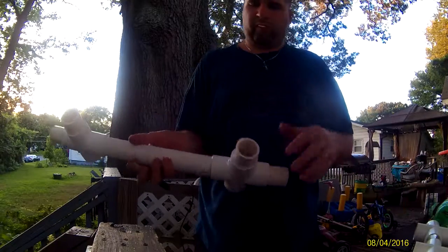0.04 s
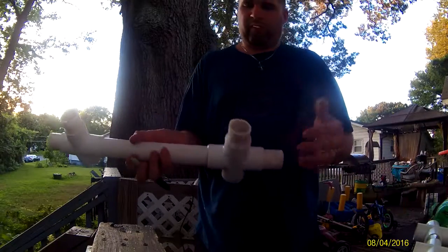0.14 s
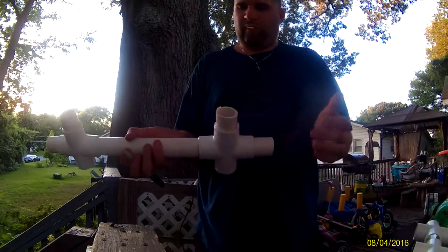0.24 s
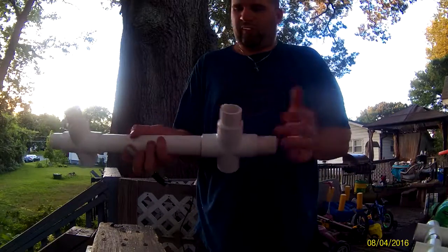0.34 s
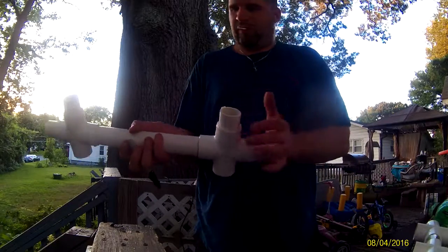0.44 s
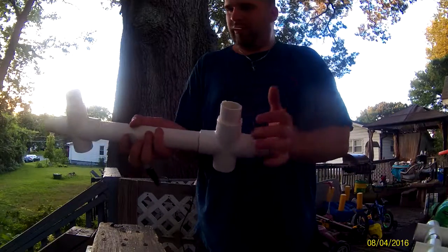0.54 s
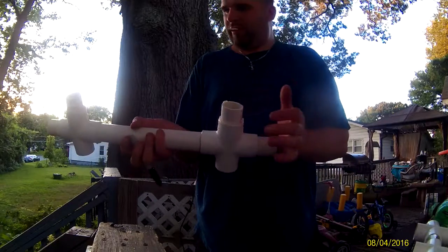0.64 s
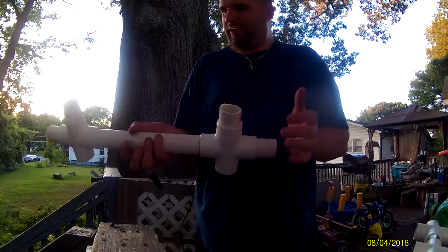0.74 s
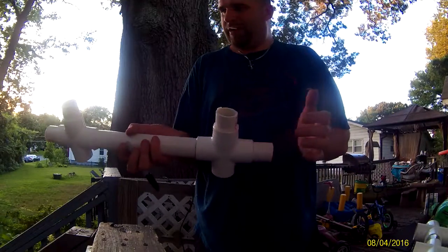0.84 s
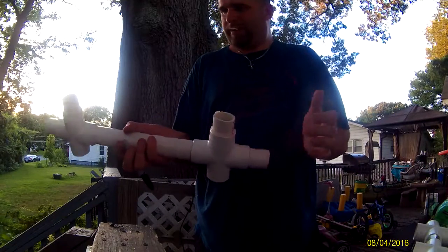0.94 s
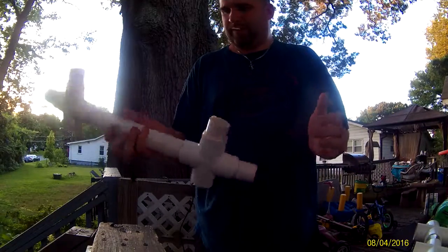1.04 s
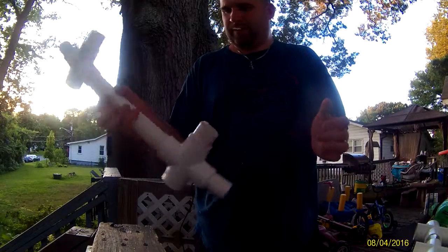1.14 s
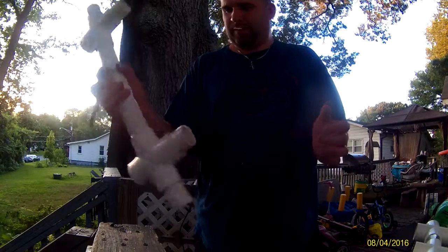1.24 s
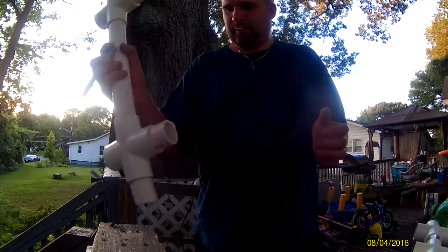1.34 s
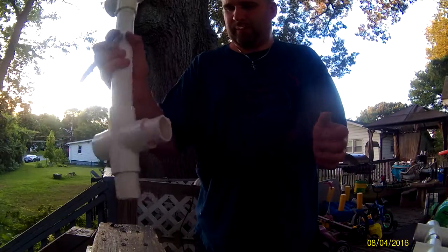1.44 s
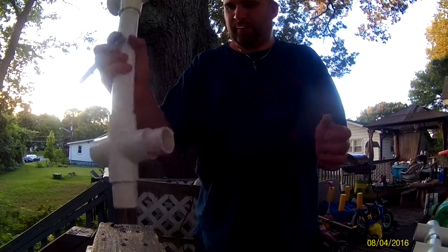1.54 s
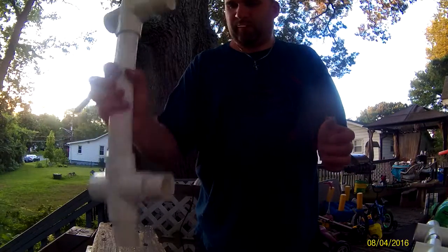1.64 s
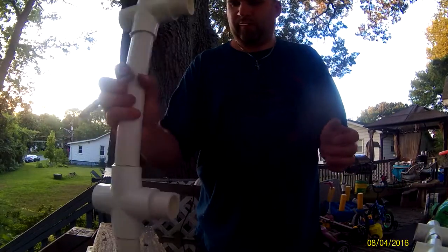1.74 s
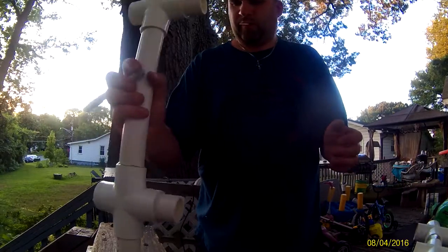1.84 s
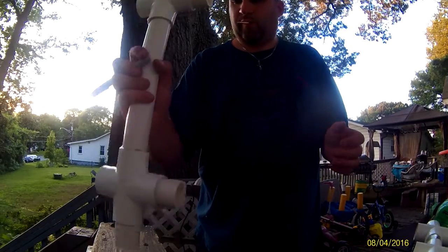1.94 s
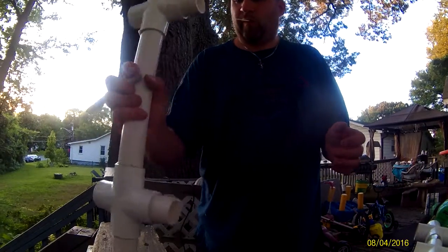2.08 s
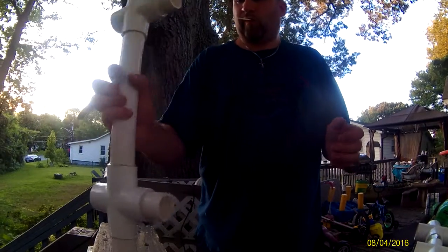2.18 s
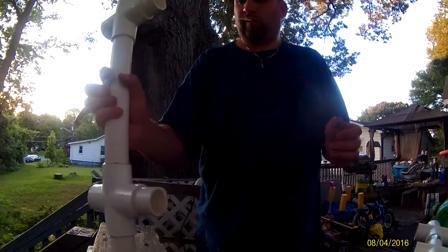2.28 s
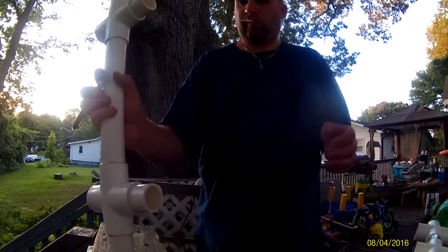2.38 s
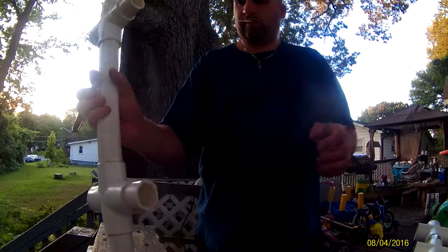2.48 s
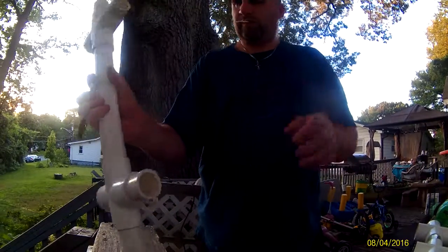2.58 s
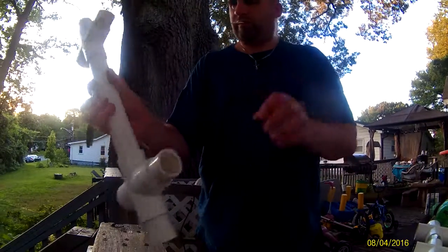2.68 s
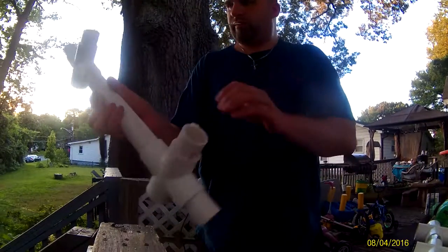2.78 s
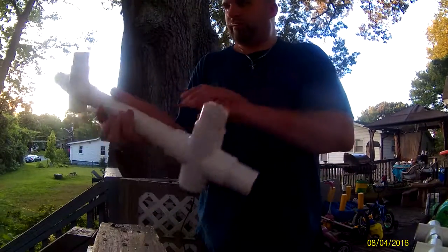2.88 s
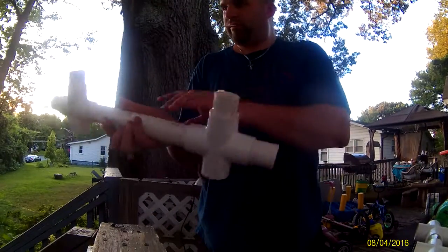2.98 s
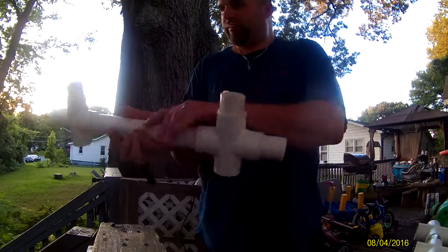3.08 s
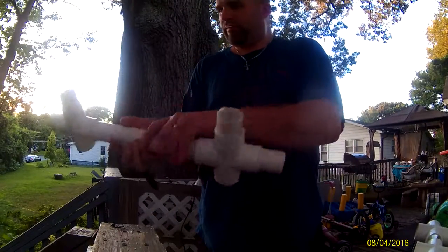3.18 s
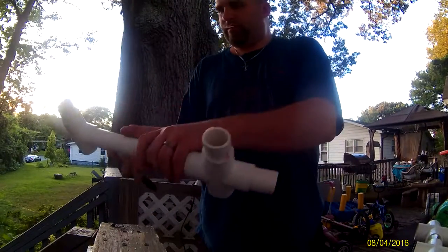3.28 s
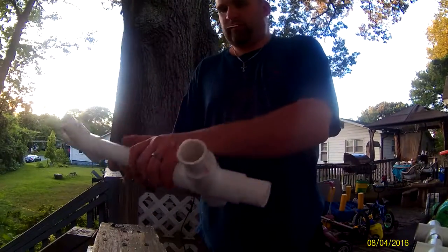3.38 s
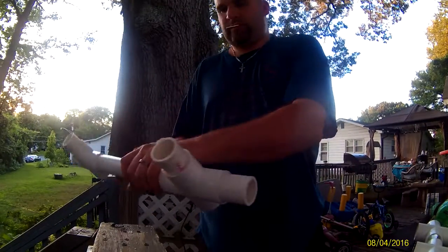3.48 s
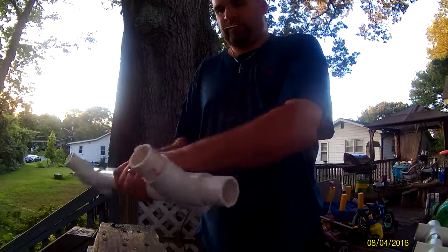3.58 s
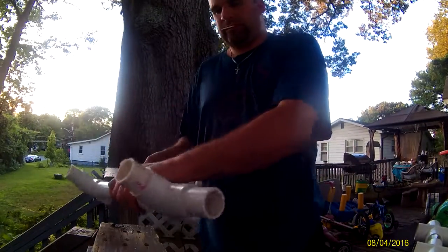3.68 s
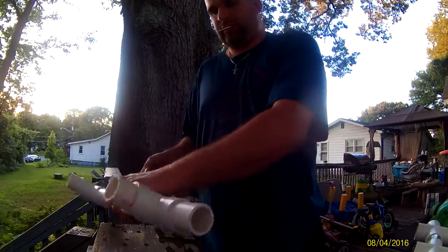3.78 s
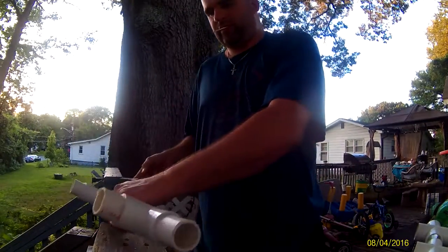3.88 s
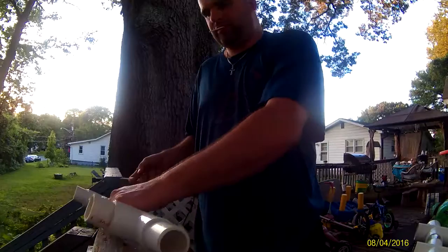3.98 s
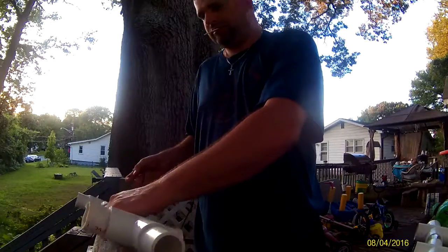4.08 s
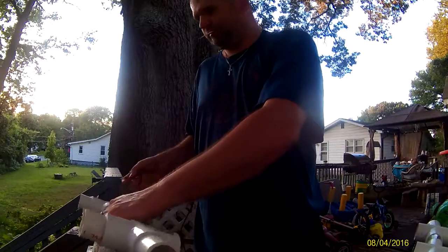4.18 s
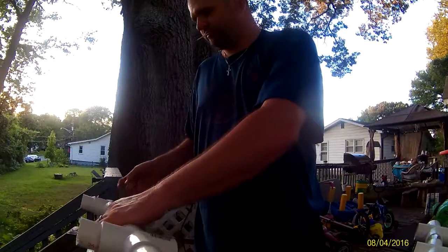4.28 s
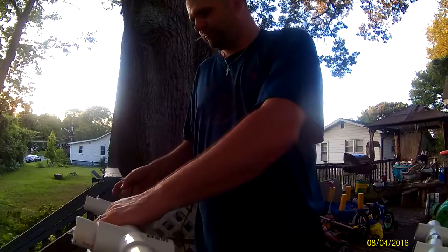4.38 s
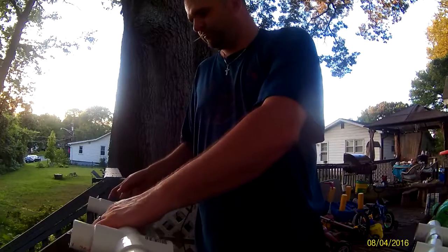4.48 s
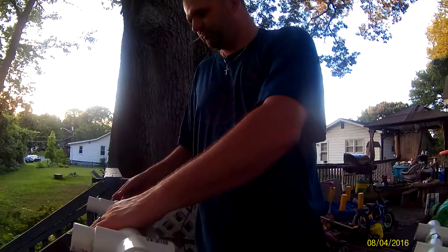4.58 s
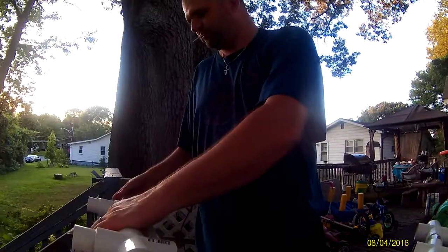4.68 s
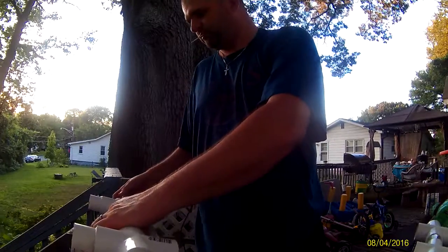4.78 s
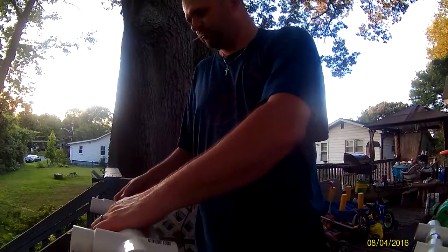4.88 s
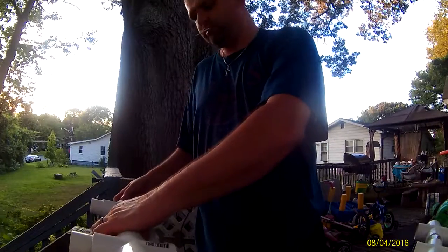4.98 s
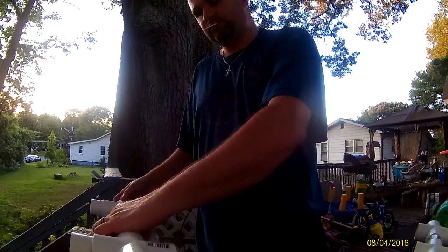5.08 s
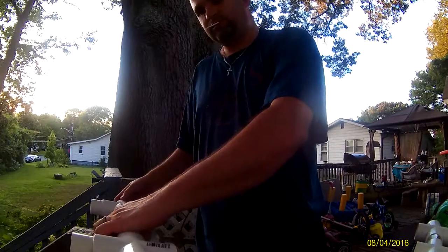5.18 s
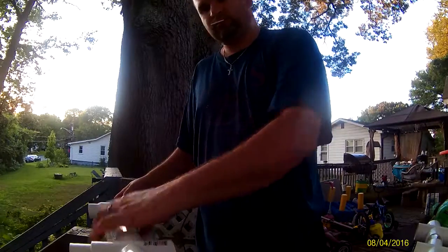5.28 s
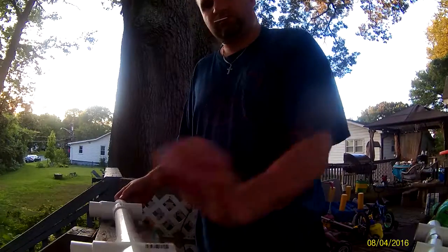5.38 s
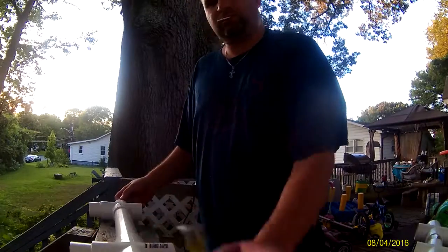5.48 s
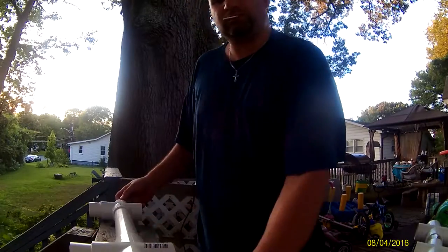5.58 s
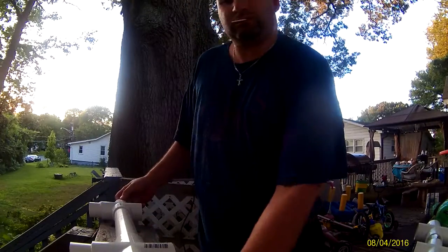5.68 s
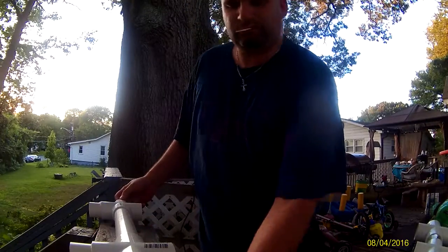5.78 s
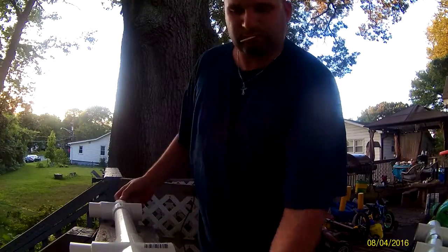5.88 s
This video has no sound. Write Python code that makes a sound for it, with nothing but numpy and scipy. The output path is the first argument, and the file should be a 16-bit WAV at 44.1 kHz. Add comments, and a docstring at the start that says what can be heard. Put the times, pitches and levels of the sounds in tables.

```python
"""Plastic pipes knocked on a wooden bench

A frame of plastic pipes is patted by hand, stood twice on a bench, then laid down and shifted about.
Pats and knocks are dying sines, the knocks with bursts of noise; rubs, scuffs and rattles are shaped noise.
The two hard knocks overload the input, set the air in the pipes ringing and make a loose part chatter.
A hand scuffs over the bench at the end. Outdoors: quiet air, insects and a thin electronic whine."""
import sys
import numpy as np
from scipy import signal
from scipy.fft import rfft, irfft
from scipy.io import wavfile

SR = 44100
rng = np.random.default_rng(int(sys.argv[2]) if len(sys.argv) > 2 else 0)


def to_wav(s):
    """Save 16-bit WAV."""
    ch = np.atleast_2d(s).T  # columns
    pcm = np.round(np.clip(ch, -1, 1) * 32767)  # PCM
    wavfile.write(sys.argv[1], SR, pcm.astype(np.int16))


N = 261557  # length of the scene in samples
RING_T = np.arange(SR) / SR  # one second of time steps

# Columns called relative_db give balance only: the sound is scaled again later.
# Colour of the outdoor air: pitch_hz, relative_db (per Hz)
AIR_COLOUR = [(20, -3), (107, -2), (240, -7.5), (320, -11), (620, -14.5), (1000, -18.5), (2000, -25),
              (3500, -30), (5000, -31.5), (9000, -34.5), (16000, -36.5)]
# How long the echo of the yard lasts: pitch_hz, fade_60db_s
YARD_FADE = [(100, 0.94), (400, 0.38), (1400, 0.41), (3000, 0.11), (10000, .1)]
# Rasps of a single insect: middle_s, level_db, length_s
INSECT_RASPS = [(1.072, -71.5, .2), (1.352, -83, 0.094), (3.955, -76, 0.2)]
# Colour of the far chorus: pitch_hz, relative_db (per Hz)
CHORUS_COLOUR = [(6000, -41.5), (6350, -9), (6550, -2), (6800, 1.5), (7000, -7.5), (7400, -33), (8000, -54.0)]
# Colour of the rasping insect and of a steady faint hiss: pitch_hz, relative_db (per Hz)
RASP_COLOUR = [(4600, -46), (5500, -1.5), (5900, 4), (7300, -1), (8200, -12.0), (9500, -44.0)]

# Pushes along the bench: middle_s, half_length_s, board_rumble_db, wall_hiss_db, skin_hiss_db
# (before the flicker of the grain)
PUSHES = [(4.223, 0.1, -61, -81, -92), (4.486, 0.021, -53, -71, -88), (4.848, 0.036, -53, -67, -73),
          (5.155, 0.062, -51.5, -55.5, -62), (5.332, 0.12, -51, -72, -93), (5.587, 0.061, -53, -70, -52.5),
          (5.733, 0.15, -61, -57, -71), (5.87, 0.035, -43, -47, -61.5)]
# Colour of the rubbed boards: pitch_hz, relative_db (per Hz)
BOARD_COLOUR = [(80, -18), (160, 3), (230, -1), (300, 0), (460, -1.5), (750, -8), (1200, -34), (3000, -45)]
# Colour of the rubbed pipe wall: pitch_hz, relative_db (per Hz)
WALL_COLOUR = [(600, -20), (1000, -14), (1230, 4.5), (1400, 1), (1620, 6.5), (1900, -27), (2400, -19),
               (6000, -44)]
# Sharp slips of skin and plastic on wood: start_s, level_db (before rise, fade and grain),
# fade_s (to about a third), tilt_db_per_octave
SLIPS = [(4.785, -41, 0.0072, 3.5), (5.127, -24, 0.01, -6), (5.505, -38, 0.0054, 7.5),
         (5.527, -49, 0.0066, 0), (5.539, -42, 0.0073, 2), (5.548, -36.5, 0.0062, 4),
         (5.569, -33.5, 0.0041, 2.5), (5.584, -34, 0.0049, 3.5), (5.596, -31, 0.0062, 1),
         (5.644, -45, 0.026, 0), (5.707, -47.5, .011, 3), (5.812, -33, 0.013, -1),
         (5.862, -42, 0.035, -0.5)]
# Colour of skin and plastic on wood: pitch_hz, relative_db (per Hz)
SLIP_COLOUR = [(530, -60), (900, -12), (1230, 0.5), (2960, -7), (3190, -9), (4050, -5.5), (5040, -10),
               (6480, -7), (8760, -14), (15200, -12), (16000, -48)]
# Runs of ticks from a loose plastic part: start_s, first_tick_db (before rise and fade)
TICK_RUNS = [(1.7368, -17.5), (1.749, -26.5), (1.7612, -20.5), (2.0876, -12.5), (2.095, -10), (2.1084, -23),
             (2.126, -29.5), (2.1484, -37)]
# Ring of the loose part: pitch_hz, relative_db (per Hz)
LOOSE_PART_COLOUR = [(1500, -27), (3700, -6.5), (5100, 2.5), (6800, -10), (8200, -4.5), (9400, -15),
                     (11000, -10), (13000, -28), (16000, -35.5)]

# Palm pats: start_s, note_db (added to the modes), skin_db (before the slap setting)
PALM_PATS = [(0.4662, -36, -27), (0.473, -64, -27)]
# Notes of the held pipe under a palm: pitch_hz, level_db (before the pat's level), fade_60db_s
HELD_PIPE = [(444, 1.5, 0.24), (698, -1, 0.11), (1180, -14, 0.14), (1700, -18, 0.058)]
# Colour of the skin slap: pitch_hz, relative_db (per Hz)
SKIN_COLOUR = [(200, -18), (500, 13.5), (1200, -7.5), (2000, -12), (3100, -8.5), (3700, -25), (12000, -31)]

# Knocks and rebounds of the frame lying down: start_s, strength_db (before the body boost),
# hardness_hz (upper corner), most_excited_hz, rebound_delay_s, rebound_db (against the first knock)
LYING_KNOCKS = [(4.197, -28.5, 1450, 880, .007, -5.5), (4.502, -30.5, 1100, 459, 0.033, -16.5),
                (4.651, -40.5, 640, 427, 0.0091, -16), (4.862, -35, 400, 373, .02, -18),
                (4.9516, -22.5, 1830, 910, 0.008388, -11.5), (4.984, -23.5, 1350, 424.9, .024, -2),
                (5.125, -12, 1200, 285, .014, -2), (5.1305, -7.5, 2585, 326, 0.0297, -25),
                (5.178, -23.5, 1400, 342, 0.012, -14), (5.271, -7.5, 1980, 520, 0.014, -3),
                (5.3604, -14, 820, 457, .025, -7), (5.435, -16, 720, 520, 0.029, -16),
                (5.455, -31, 2400, 1570, .006, -11), (5.827, -26, 1975, 424.4, 0.017, -7),
                (5.851, -23, 1400, 450, 0.012, -3.5), (5.913, -35, 880, 412, 0.011, 3)]
# Pipe and bench when the pipe lies under the hands: pitch_hz (before a small detune), relative_db, fade_60db_s
LYING_MODES = [(166.2, -10, 0.18), (235, -3, 0.11), (302.7, 4.5, 0.072), (394, -13, 0.11),
               (416, -11, 0.064), (487, 0, 0.09), (565, -1.5, 0.051), (640, -7.5, 0.063), (711, 6, 0.03),
               (838, -3, 0.032), (920, -8, 0.057), (1030, -5.5, 0.013), (1224, -1.5, 0.049),
               (1520, -5.5, 0.035), (1583.4, -6, 0.036), (1656, -6, 0.023), (1970, 10, 0.005),
               (2545, -4.5, 0.03)]
# Pipe and bench when the pipe stands upright: pitch_hz (before a small detune), relative_db, fade_60db_s
UPRIGHT_MODES = [(143, -21.5, 0.22), (286, -2, 0.066), (329.4, -7.5, 0.098), (412.8, -0.5, 0.036),
                 (521.3, 2.5, 0.044), (578.5, 0.5, 0.045), (750, -2.5, 0.07), (901, -9.5, 0.056),
                 (1089, -2.5, 0.013), (1240, -3.5, 0.044), (1419.3, -6, 0.04), (1524, -3.5, 0.037),
                 (1754, -8, 0.016), (1934, -11.5, 0.037), (2230, -7, 0.022), (2760, -0.5, 0.025)]
# Crowded small modes of wall and board: pitch_hz, relative_db (per Hz)
CRACK_COLOUR = [(100, -14), (300, 0), (1600, 2), (2700, -6), (3500, -12.5), (5000, -6.5), (9000, -12),
                (16000, -17)]

# Frame stood on its end: start_s, strength_db (body boost comes on top for the blows),
# lightness_hz (lower corner), seating_most_excited_hz, air_ring_db (added to the air modes),
# air_tilt_db_per_octave, first_flight_s, first_bounce_db (before edge and body levels)
FRAME_STANDS = [(1.7265, 1, 199.4, 1420, -26.5, -1.5, .0313, -14),
                (2.0775, 8, 174.4, 511.3, -28.5, 4, .0574, -8)]
# Each landing touches with the rim, seats flat, then settles:
# delay_s, level_db (against the strength), hardness_hz (upper corner)
LANDING_STEPS = [(0, 1.5, 1099), (.0029, 5.5, 2996), (0.011, -12.5, 2110)]
# The two edges of the rim: delay_share (of the first flight), level_db (against the bounce),
# change_per_bounce_db, most_excited_hz
RIM_EDGES = [(0, -1.5, -23.5, 857), (0.221, -3, -12.5, 1400)]
# Air columns inside the open pipes: pitch_hz, level_db (before the ring's level and tilt), fade_60db_s
PIPE_AIR = [(454, -5, 0.44), (641, -1.5, 0.57), (1334, -9.5, 0.44), (1690, -19.5, .2)]
# The deck under a landing: pitch_hz, level_db (before the landing's strength), fade_60db_s
DECK_MODES = [(35.25, -31, .071), (98, -26, .08)]

AIR_LEVEL_DB = -57
WHINE_HZ, WHINE_BUZZ_HZ = 13364, 41
CHORUS_PER_S, CHORUS_CREST_S = 3.35, .268
CHORUS_DB, CHORUS_SWING_DB, CHORUS_DRIFT_DB = -70.5, 2.5, -1.4
TICK_GAP_S, TICK_JITTER, TICK_LOSS_DB = .0035, 0.24, -9
REBOUND_LIFT, REBOUND_HARDNESS = 1.22, 0.58  # a rebound favours higher modes and is a little softer
LIGHT_HZ, LIGHT_AT_HZ, LIGHT_POWER = 236, 450, 0.49  # the higher a knock is pitched, the more bass it loses
RIM_HZ, SETTLE_HZ = 500, 1358  # most excited by the first touch and by the settling
BOUNCE_HARD_HZ, BOUNCE_SOFTENING = 1250, 0.65  # upper corner of the first bounce, its factor per bounce
BOUNCE_LIGHT_HZ = 380  # lower corner of every bounce
BOUNCE_KEEP = .635  # each flight lasts this share of the one before
EDGE_HZ = 16200  # upper limit of the sound


def gain_of(db):
    """Turns decibels into amplitude."""
    return 10 ** (np.asarray(db) / 20)


def evened(x):
    """Scales a sound to rms 1."""
    return x / np.sqrt(np.mean(x ** 2) + 1e-20)


def read(points, hz):
    """Reads a table between its points, on a log-frequency axis."""
    f, value = np.transpose(points)
    return np.interp(np.log(hz + 1), np.log(f + 1), value)


def add(mix, s, sound):
    """Mixes a sound in at time s."""
    part = mix[round(s * SR):][:len(sound)]
    part += sound[:len(part)]


def noise(colour, size, tilt_db=0):
    """Noise of rms 1 with a given colour, tilted in dB per octave."""
    hz = np.fft.rfftfreq(size, 1 / SR)
    shape = gain_of(read(colour, hz) + tilt_db * np.log2(hz + 1))
    return evened(irfft(rfft(rng.standard_normal(size)) * shape, size))


def wander(hz):
    """Smooth random movement of rms 1, with nothing faster than hz."""
    slow = np.fft.rfftfreq(N, 1 / SR) < hz
    return evened(irfft(rfft(rng.standard_normal(N)) * slow, N))


def filtered(x, hz, kind, order=2):
    """Low-pass or high-pass filter that only looks back in time."""
    return signal.sosfilt(signal.butter(order, min(hz, .45 * SR), kind, fs=SR, output="sos"), x)


def ring(modes, spread_db=0):
    """Dying sines, the weight of each shifted by chance if a spread is given."""
    hz, db, t60 = np.transpose(modes)[:, :, None]
    t = RING_T[RING_T < 1.2 * t60.max()]
    sign = (-1) ** (np.arange(len(hz))[:, None] // 2)
    weight = sign * gain_of(db + spread_db * rng.standard_normal(hz.shape))
    fade = gain_of(-60 * t / t60)
    return (weight * fade * np.sin(2 * np.pi * hz * t)).sum(0)


def background(whine_db=-72):
    """Quiet outdoor air as noise, and a high whine that buzzes as its sign flips."""
    t = np.arange(N) / SR
    # odd harmonics add up to a rounded square wave
    flips = sum(np.sin(2 * np.pi * k * WHINE_BUZZ_HZ * t) / k for k in range(1, 12, 2))
    whine = evened(flips * np.sin(2 * np.pi * WHINE_HZ * t + .5 * wander(6)))
    return gain_of(AIR_LEVEL_DB) * noise(AIR_COLOUR, N) + gain_of(whine_db) * whine


def insects(flutter_db=0.82, hiss_db=-76.5):
    """A far chorus swells about three times a second; one insect rasps now and then over a faint hiss."""
    beat = np.cos(2 * np.pi * CHORUS_PER_S * (np.arange(N) / SR - CHORUS_CREST_S))
    swell = gain_of(CHORUS_DB + CHORUS_SWING_DB * beat + CHORUS_DRIFT_DB * wander(2))
    chorus = swell * noise(CHORUS_COLOUR, N) * gain_of(flutter_db * wander(60))
    rasp = np.zeros(N)
    for s, db, length_s in INSECT_RASPS:
        add(rasp, s - length_s / 2, gain_of(db) * signal.windows.tukey(round(length_s * SR), .7))
    return chorus + (rasp + gain_of(hiss_db)) * noise(RASP_COLOUR, N)


def yard(x):
    """Faint scatter from deck, tree and houses: a noise tail whose treble dies first."""
    hz, t, z = signal.stft(rng.standard_normal(SR), SR, nperseg=256)
    fade = gain_of(-60 * t / read(YARD_FADE, hz)[:, None])
    tail = signal.istft(z * fade, SR, nperseg=256)[1]
    tail = filtered(tail[:SR], 1800, "low") * (1 - np.exp(-RING_T / 0.014))
    return signal.fftconvolve(x, tail / np.linalg.norm(tail))[:N]


def slides(grain_db=3.0, catch_db=6.5, catch_hz=90, skin_tilt_db=1.0):
    """Each push rubs the boards and the pipe wall, while the hand catches and slips on the wood."""
    t = np.arange(N) / SR
    boards, wall = noise(BOARD_COLOUR, N), noise(WALL_COLOUR, N)
    skin = noise(SLIP_COLOUR, N, skin_tilt_db) * gain_of(catch_db * wander(catch_hz))
    out = np.zeros(N)
    for s, half_s, board_db, wall_db, skin_db in PUSHES:
        speed = np.exp(-np.minimum(((t - s) / half_s) ** 2, 20))  # swells and fades
        out += speed * (gain_of(board_db) * boards + gain_of(wall_db) * wall + gain_of(skin_db) * skin)
    return out * gain_of(grain_db * wander(440))


def scuffs(rise_s=0.0012, grain_db=2.5):
    """Short slips as bursts of noise, made grainy by a fast flicker of the level."""
    out, t = np.zeros(N), RING_T[:8192]
    for s, db, fade_s, tilt_db in SLIPS:
        shape = (1 - np.exp(-t / rise_s)) * np.exp(-t / fade_s)
        add(out, s, gain_of(db) * noise(SLIP_COLOUR, len(t), tilt_db) * shape)
    return out * gain_of(grain_db * wander(410))


def chatter(rise_s=0.00053, fade_s=0.0012, count=3):
    """A loose part, thrown up by the hard blows, bounces in quick, dying runs of bright ticks."""
    out, t = np.zeros(N), RING_T[:1024]
    shape = (1 - np.exp(-t / rise_s)) * np.exp(-t / fade_s)
    for s, db in TICK_RUNS:
        for k in range(count):
            tick = noise(LOOSE_PART_COLOUR, len(t)) * shape
            add(out, s, gain_of(db + k * TICK_LOSS_DB) * tick)
            s = s + TICK_GAP_S * np.exp(TICK_JITTER * rng.standard_normal())
    return out


def pats(slap_db=-12, slap_t60=0.038):
    """A palm taps the pipe: a small slap of skin (noise) and a soft, hollow note (dying sines)."""
    out, t = np.zeros(N), RING_T[:4096]
    for s, db, skin_db in PALM_PATS:
        add(out, s, gain_of(db) * ring(HELD_PIPE))
        slap = gain_of(skin_db + slap_db - 60 * t / slap_t60) * noise(SKIN_COLOUR, len(t))
        add(out, s, slap)
    return filtered(out, 210, "high")


def contact(modes, hard_hz, light_hz, main_hz, main_db, crack_db, crack_t60, detune, snap_t60):
    """One blow of unit energy: a soft contact loses treble, a light one loses bass."""
    hz, db, t60 = np.transpose(modes)
    db = db + main_db * np.exp(-(np.log2(hz / main_hz) / 0.24) ** 2)  # the struck spot favours some modes
    hz = hz * (1 + detune * rng.standard_normal(len(hz)))  # each blow's modes are detuned a little by chance
    body = ring(np.transpose([hz, db, t60]), spread_db=2.44)
    t = RING_T[:len(body)]
    crack = gain_of(crack_db) * noise(CRACK_COLOUR, len(t))
    # the bright snap has its own, shorter fade than the low crack
    body = body + filtered(crack, 1900, "low", order=6) * gain_of(-60 * t / crack_t60)
    body = body + filtered(crack, 2200, "high", order=6) * gain_of(5 - 60 * t / snap_t60)
    body = filtered(body, hard_hz, "low")
    body = filtered(body, light_hz, "high", order=1)
    body = filtered(body, 47, "high")  # keeps deep bass out of the blow
    return body / np.linalg.norm(body)


def knocks(body_db=17):
    """Damped, hollow knocks of the fittings on the boards, each followed by a softer rebound."""
    out = np.zeros(N)
    for s, db, hard_hz, main_hz, rebound_s, rebound_db in LYING_KNOCKS:
        first = (s, db, hard_hz, main_hz)
        rebound = (s + rebound_s, db + rebound_db, hard_hz * REBOUND_HARDNESS, main_hz * REBOUND_LIFT)
        for at, strength, hard, main in (first, rebound):
            light = LIGHT_HZ * (main / LIGHT_AT_HZ) ** LIGHT_POWER
            blow = contact(LYING_MODES, hard, light, main, main_db=9.0, crack_db=1.5,
                           crack_t60=0.055, detune=0.021, snap_t60=0.031)
            add(out, at, gain_of(strength + body_db) * blow)
    return out


def stands(body_db=17, count=2):
    """The end of the frame hits the bench and bounces; the deck thumps and the air in the pipes sings on."""
    out = np.zeros(N)
    for s, db, light_hz, seat_hz, air_db, air_tilt_db, flight_s, bounce_db in FRAME_STANDS:
        blows = []
        for (delay, step_db, hard), main in zip(LANDING_STEPS, (RIM_HZ, seat_hz, SETTLE_HZ)):
            blows.append((s + delay, db + step_db, hard, light_hz, main))
        lands = s
        for k in range(count):
            lands = lands + flight_s * BOUNCE_KEEP ** k
            hard = BOUNCE_HARD_HZ * BOUNCE_SOFTENING ** k
            for share, edge_db, change_db, main in RIM_EDGES:
                strength = bounce_db + edge_db + k * change_db
                blows.append((lands + share * flight_s, strength, hard, BOUNCE_LIGHT_HZ, main))
        for at, strength, hard, light, main in blows:
            blow = contact(UPRIGHT_MODES, hard, light, main, main_db=7.0, crack_db=4.5,
                           crack_t60=0.052, detune=0.015, snap_t60=.026)
            add(out, at, gain_of(strength + body_db) * blow)
        # the tilt turns around the second air note
        air = [(hz, mode_db + air_tilt_db * np.log2(hz / PIPE_AIR[1][0]), t60) for hz, mode_db, t60 in PIPE_AIR]
        add(out, s, gain_of(air_db) * ring(air))
        add(out, s, gain_of(db) * ring(DECK_MODES))
    return out


def scene():
    """All sources at one close microphone, with the yard answering the near ones."""
    near = stands() + knocks() + pats() + chatter() + scuffs() + slides()
    return (near + gain_of(-44.5) * yard(near) + insects() + background())[None]


def record(dry, ceiling=0.68):
    """The input overloads, flattening peaks above the ceiling; then the highest treble is cut."""
    clipped = np.clip(dry, -ceiling, ceiling)
    low_pass = signal.firwin(511, EDGE_HZ, window=("kaiser", 9), fs=SR)
    return signal.oaconvolve(clipped, low_pass[None], "same")


dry = scene()
out = record(dry)
to_wav(out)
```